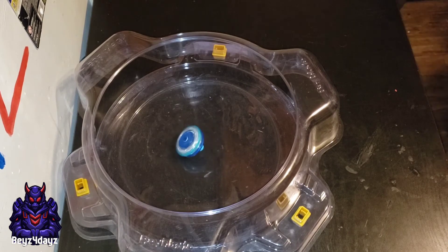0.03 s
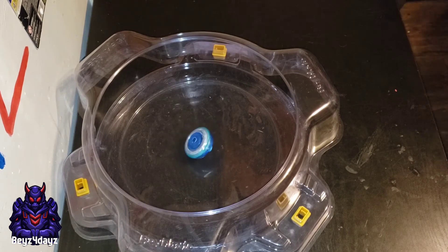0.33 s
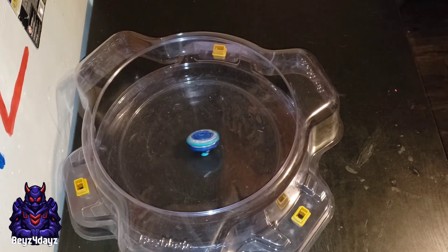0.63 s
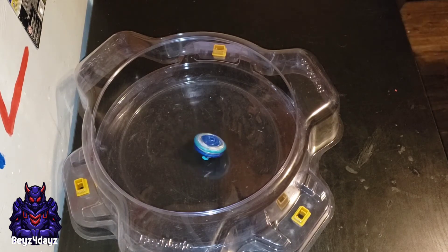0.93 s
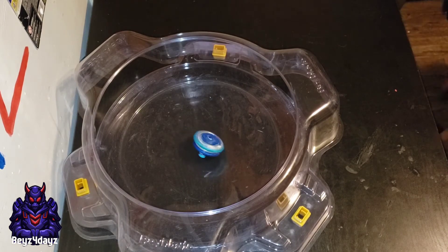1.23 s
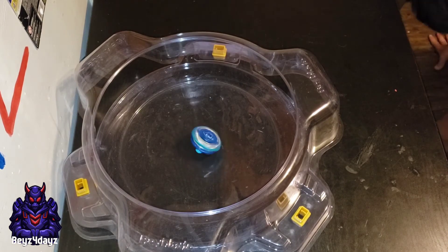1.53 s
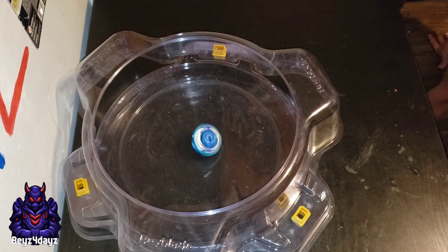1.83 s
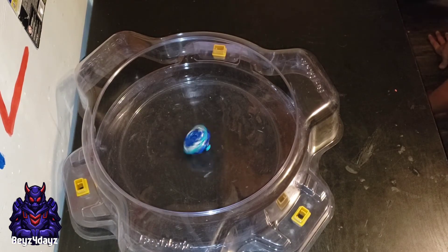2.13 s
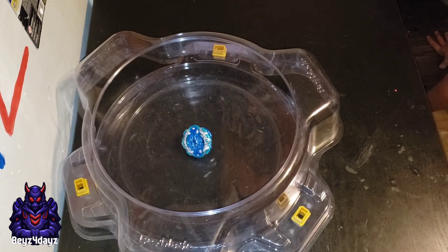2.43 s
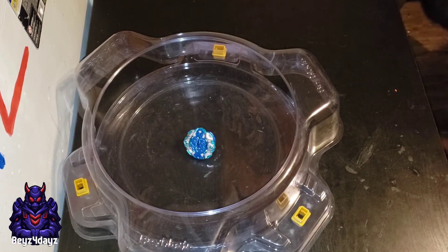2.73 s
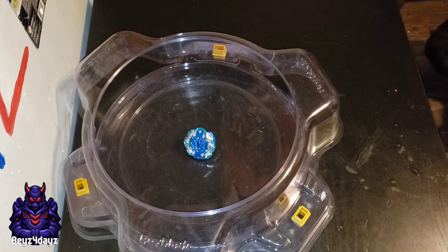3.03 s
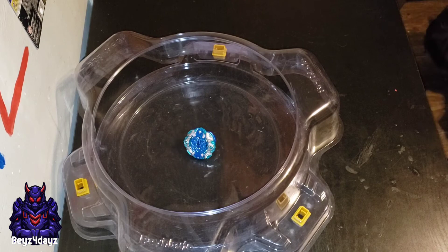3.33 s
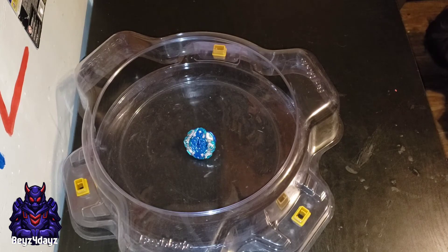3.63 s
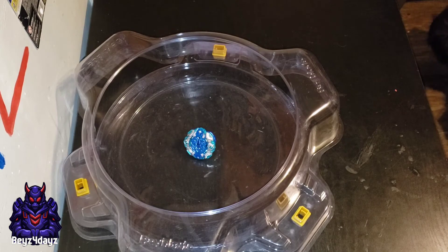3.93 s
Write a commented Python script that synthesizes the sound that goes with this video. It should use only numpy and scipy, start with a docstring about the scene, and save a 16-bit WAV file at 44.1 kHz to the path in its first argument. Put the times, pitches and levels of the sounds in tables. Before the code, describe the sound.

A toy top wobbles and rattles in a plastic arena, then rolls to a stop.

```python
"""In a quiet room with a low hum, a nearly spent toy top wobbles in a thin plastic stadium.
Its rim knocks on the stadium floor again and again: the floor booms, the walls ring and the contact
cracks. In between, the tip scratches on and loose parts rattle. Then the top lies over,
rolls to and fro on its rim and settles with a small tick."""
import sys
import numpy as np
from scipy import signal
from scipy.fft import rfft, irfft
from scipy.io import wavfile

SR = 44100
rng = np.random.default_rng(int(sys.argv[2]) if len(sys.argv) > 2 else 0)


def master(y):
    """Save y as 16-bit WAV."""
    cut = np.clip(np.atleast_2d(y).T, -1, 1)
    pcm = np.round(cut * 32767)  # scale
    wavfile.write(sys.argv[1], SR, pcm.astype(np.int16))


N = 176400
T = np.arange(N) / SR
RING_T = T[:SR // 5]  # the time axis of one short sound

# Levels are relative. A "mode" is a tone an object rings at; t60 is the time to fade by 60 dB.
# tones of the room's hum: f/Hz, level/dB
HUM = [(72, -66.5), (113, -68.5)]
# tone colours of the noises, from bass to treble: f/Hz, level/dB
AIR = [(25, -16), (70, 4.5), (88, -4.5), (115, -1), (170, -14.5), (800, -28), (8500, -43), (12000, -37)]
RUMBLE = [(35, -20), (65, -1), (120, -5.5), (590, -9.5), (720, -17), (1400, -42)]
SCRAPE = [(450, -15.5), (1100, -5), (1800, -2), (3400, 0), (4000, -7.5), (5500, -24)]
SCRATCH = [(2000, -38.5), (3500, -1.5), (5000, 1), (7200, -6), (8300, -24)]
HISS = [(6000, -14.5), (8300, -12), (12000, 1), (16000, -7)]
CLATTER = [(450, 3.5), (720, -4), (1100, 2), (1300, 0), (1650, 2.5), (2500, -3), (5000, -23.5)]
CRACK = [(1200, -22.5), (2400, 0), (3300, 1), (7000, -2.5), (8100, -12.5), (10500, -7.5), (11900, -2.5),
         (14500, -9.5)]
DRUM = [(25, -9), (60, 7), (120, 3), (330, -11), (1500, -41)]
# how hard the tip presses as the wobble eases and widens: t/s, level/dB
TIP_PRESSURE = [(0.2, 2.5), (0.55, -3), (1.2, 1.5), (2.1, -1)]
# knocks of the rim: t/s, boom/dB, hollow ring/dB, crack/dB
KNOCKS = [(0.0002, -29.5, -45.0, -41.5), (0.0275, -25, -34, -33.5), (0.0497, -27.5, -40, -33.5),
          (0.09, -29, -29.5, -37), (0.1583, -33, -30.5, -37), (0.2273, -23.5, -30, -35),
          (0.3165, -26, -38.5, -35.5), (0.377, -25.5, -40, -35.5), (0.436, -44, -43.5, -43),
          (0.5381, -45.5, -40.5, -44.5), (0.6434, -34, -37.5, -36), (0.6983, -27.5, -37.5, -35),
          (0.7718, -39, -39.5, -47.5), (0.8308, -30, -42, -41.5), (0.8735, -32.5, -39.5, -34.5),
          (0.9302, -30.5, -37, -39), (0.98, -31.5, -35.5, -41), (0.9913, -28.5, -33, -44),
          (1.0439, -28.5, -34.0, -38), (1.0556, -34.5, -40.5, -39.5), (1.1063, -27.5, -34, -38),
          (1.1528, -26, -39.5, -34.5), (1.192, -30, -41, -31.0), (1.2259, -27, -37.5, -35),
          (1.2747, -23.5, -32, -35.5), (1.3401, -28.5, -41.5, -36.5), (1.4139, -34, -34.5, -30),
          (1.461, -30, -36.5, -27.5), (1.498, -29.5, -33, -34.5), (1.5547, -29.5, -34, -33.5),
          (1.58, -35, -51, -44), (1.6, -34.5, -45.5, -41), (1.6504, -35, -37.5, -33.5),
          (1.6864, -32, -37, -46.5), (1.7055, -30.5, -43.5, -36.5), (1.7687, -31.5, -39.5, -33),
          (1.8115, -32, -40.5, -42), (1.8387, -42, -42.5, -34), (1.8755, -35.0, -41.5, -50.5),
          (1.9146, -29.5, -39.5, -41), (1.9576, -32.0, -41.5, -45), (2.0068, -34.5, -45, -33),
          (2.052, -40, -48.5, -45), (2.073, -34.5, -39.5, -50), (2.101, -38.5, -50.5, -47.5),
          (2.1582, -39.5, -38.5, -39.5), (2.3789, -40.5, -48.5, -61), (2.3873, -40, -53.5, -55),
          (2.42, -42.5, -62, -60), (2.612, -48.5, -56, -58)]
# deep modes of the stadium floor: f/Hz, level/dB, t60/s
FLOOR_MODES = [(64, -26, .16), (108, -25, .12), (148, -32, .15), (245, -14, .07), (318, 1, .11),
               (420, -15, .05)]
# modes of the floor (higher, hollow), the walls, the top, the floor under the rolling rim: f/Hz, level/dB
HOLLOW_MODES = [(498, -4.5), (555, -0.5), (604, -0.5)]
WALL_MODES = [(810, -8), (990, -2), (1095, -2), (1156, -2.5), (1580, 2.5), (1862, -2), (2830, -7)]
TOP_MODES = [(1210, 10), (1990, 1), (2430, 2), (3000, 5), (3220, 5), (3480, 4)]
ROLL_MODES = [(405, 10.5), (515, 0)]
# slides of the rim: loudest t/s, half length/s, scrape/dB, scratch/dB, hiss/dB
SLIDES = [(2.194, 0.043, -41.5, -44.5, -56), (2.28, 0.054, -65, -65, -49.5), (2.36, 0.036, -46, -51.5, -63),
          (2.556, 0.025, -55.5, -59.5, -61.5), (2.63, 0.023, -49, -53, -55.5),
          (2.74, 0.037, -46, -51.5, -76), (2.825, 0.044, -56, -50.5, -55), (2.98, 0.095, -78, -70, -80),
          (3.131, 0.042, -72, -63.5, -74), (3.269, 0.057, -74.5, -68.5, -81)]
# the rolling weight drums on floor and table: t/s, level/dB
DRUMMING = [(2.1, -54.5), (2.38, -47.5), (2.48, -64), (2.62, -54), (2.84, -53.5), (2.92, -67.5), (3.3, -86)]
# light touches of the rim: t/s, clatter/dB, crack/dB
TICKS = [(2.523, -57, -60), (2.795, -39, -56), (3.098, -76, -57)]
# how much of the left-right difference is kept: f/Hz, level/dB
WIDTH = [(60, -9), (600, -0.5), (1200, -2.5), (4000, 0.5)]
# how much louder the left side is: f/Hz, level/dB
LEFT_BOOST = [(60, 4), (200, 3.5), (600, 4.5), (1200, 0), (5200, -0.5), (7500, 11.5), (12000, 5)]

FALL_AT_S, FALL_LENGTH_S = 2.16, 0.18  # the top lies over
TIP_GRIT_DB, KNOCK_GRIT_DB, ROLL_GRIT_DB = 4.5, 1, 2  # how uneven the friction is
BOOM_DB, HOLLOW_DB, WALL_DB, CLATTER_DB, CRACK_DB = 6, 5.5, -2.5, 3.5, 4.5  # the mix within a knock
FLEX_HZ, FLEX_DB, FLEX_LAG_S, FLEX_WIDTH_S = 305, 1.5, .0023, .0024  # the floor's first give
GRAZE_S, GRAZE_DB = .0021, -2.5  # the rim scuffs the floor just before it bites
REBOUND_S, REBOUND_DB = .006, -3.5  # shortest delay and level of its lighter second contact
CRACK_T60_S = .034


def undb(db):
    """Turn decibels into a gain."""
    return 10 ** (np.asarray(db) / 20)


def unit(x):
    """Scale a signal to an average power of 1."""
    return x / np.sqrt(np.mean(x ** 2))


def fade(t60):
    """A curve that falls by 60 dB in t60 seconds."""
    return np.exp(-np.log(1000) * RING_T / t60)


def response(points):
    """The gain at every frequency, drawn through a table's points."""
    hz, db = np.array(points).T
    all_hz = np.arange(N // 2 + 1) * SR / N
    return undb(np.interp(np.log(all_hz + 1), np.log(hz), db))


def colour(x, points):
    """Give a sound a tone colour."""
    return irfft(rfft(x) * response(points), N)


def noise(points):
    """Coloured noise, unrelated left and right."""
    return unit(colour(rng.standard_normal((2, N)), points))


def through(x, impulse):
    """Let every sample of x set off a copy of the impulse."""
    return signal.fftconvolve(x, impulse, axes=-1)[:, :N]


def add(out, at_s, sound):
    """Mix a sound in at the given time."""
    start = int(at_s * SR)
    first, last = max(start, 0), min(start + sound.shape[-1], N)
    out[:, first:last] += sound[..., first - start:last - start]


def piece(x):
    """A short random piece of a long noise."""
    start = rng.integers(N - len(RING_T))
    return x[:, start:start + len(RING_T)]


def room_tone():
    """Faint air and a low hum that wavers."""
    def waver():
        return np.interp(T, np.linspace(0, T[-1], num=50), rng.standard_normal(size=50))
    hum = sum(undb(db + 2 * waver()) * np.sin(2 * np.pi * hz * T + waver()) for hz, db in HUM)
    return undb(-65.5) * noise(AIR) + hum


def friction(points, grit_db, catches_per_s=2500):
    """Rubbing surfaces catch many times, each a tiny burst of noise of its own size."""
    catches = rng.random(N) < catches_per_s / SR
    sizes = undb(grit_db * np.minimum(rng.exponential(size=N), 5))
    power = np.abs(through((catches * sizes)[None] ** 2, fade(t60=.02)[None] ** 2))
    return unit(colour(np.sqrt(power) * rng.standard_normal((2, N)), points))


def tip():
    """The tip scratches and rumbles on the floor until the top falls over."""
    layers = (SCRAPE, -50), (SCRATCH, -52), (HISS, -57.5)
    scratching = sum(undb(db) * friction(points, TIP_GRIT_DB) for points, db in layers)
    rumble = undb(-44) * noise(RUMBLE)[0]
    upright = np.clip((FALL_AT_S - T) / FALL_LENGTH_S + .5, 0, 1)
    pressure = undb(np.interp(T, *np.array(TIP_PRESSURE).T))
    return upright * pressure * (rumble + scratching)


def ringing(modes, t60=None):
    """One fading tone per mode, as complex numbers so that its phase can be turned."""
    hz, db, *own_t60 = np.array(modes).T[:, :, None]
    return undb(db) * fade(own_t60[0] if own_t60 else t60) * np.exp(2j * np.pi * hz * RING_T)


def struck(rings, scatter_db=3.5, detune=.008):
    """A hit on a new spot shifts each mode's level and pitch; the whole stays as strong."""
    level, pitch = rng.standard_normal((2, len(rings), 1))
    radians_per_s = np.angle(rings[:, 1:2]) * SR
    varied = rings * undb(scatter_db * level) * np.exp(1j * detune * pitch * radians_per_s * RING_T)
    return varied * np.linalg.norm(rings.sum(0)) / np.linalg.norm(varied.sum(0))


def spread(rings):
    """Each microphone hears each mode at its own phase."""
    return (np.exp(2j * np.pi * rng.random((2, len(rings)))) @ rings).real


def crack_fade():
    """A crack dies fast and leaves a softer, longer tail."""
    return fade(CRACK_T60_S) + undb(-4.5) * fade(t60=.11)


def knocks():
    """Each knock of the rim bends the floor, rings it and cracks; the walls ring and clatter."""
    out = np.zeros((2, N))
    floor = ringing(FLOOR_MODES)
    hollow = ringing(HOLLOW_MODES, t60=.11)
    walls = ringing(WALL_MODES, t60=.105)
    clatter, crack = friction(CLATTER, KNOCK_GRIT_DB), friction(CRACK, KNOCK_GRIT_DB)
    rise = np.minimum(RING_T / .0018, 1) ** 2
    graze_shape = undb(GRAZE_DB) * np.exp(-RING_T[::-1] / GRAZE_S)
    since = RING_T - FLEX_LAG_S
    flex = undb(FLEX_DB) * np.cos(2 * np.pi * FLEX_HZ * since) * np.exp(-(since / FLEX_WIDTH_S) ** 2)
    for at_s, boom_db, hollow_db, crack_db in KNOCKS:
        force = undb(np.mean([boom_db, hollow_db, crack_db]))
        boom = undb(boom_db + BOOM_DB)
        add(out, at_s, boom * flex)
        add(out, at_s + FLEX_LAG_S, boom * rise * struck(floor).real.sum(0))
        add(out, at_s, undb(hollow_db + HOLLOW_DB) * rise * spread(struck(hollow))[0])
        add(out, at_s, force * undb(WALL_DB) * rise * spread(struck(walls)))
        add(out, at_s, force * undb(CLATTER_DB) * rise * fade(t60=.089) * piece(clatter))
        add(out, at_s, undb(crack_db + CRACK_DB) * rise * crack_fade() * piece(crack))
        rebound = fade(CRACK_T60_S) * (force * piece(clatter) + undb(crack_db) * piece(crack))
        add(out, at_s + REBOUND_S * (1 + 2 * rng.random()), undb(REBOUND_DB) * rebound)
        graze = graze_shape * (force * piece(clatter) + undb(crack_db) * piece(crack))
        add(out, at_s - RING_T[-1], graze)
    return out


def rattle(crack, clatter, count=130, base_db=-50.5, scatter_db=8):
    """Loose parts click at random during the wobble, louder when the tip presses harder."""
    out = np.zeros((2, N))
    for at_s, size in zip(FALL_AT_S * rng.random(count), rng.standard_normal(count)):
        db = base_db + scatter_db * min(size, 2) + np.interp(at_s, *np.array(TIP_PRESSURE).T)
        add(out, at_s, undb(db) * fade(CRACK_T60_S) * (piece(crack) + piece(clatter)))
    return out


def slides(roundness=1.4):
    """The fallen top slides on its rim in swells that scrape, scratch and hiss."""
    peak_s, half_s, *levels = np.array(SLIDES).T
    swells = np.exp(-np.abs((T - peak_s[:, None]) / half_s[:, None]) ** roundness)
    scrape = friction(SCRAPE, ROLL_GRIT_DB) + undb(-6.5) * noise(RUMBLE)[0]
    layers = scrape, friction(SCRATCH, ROLL_GRIT_DB), friction(HISS, ROLL_GRIT_DB)
    return sum(np.sqrt(undb(db) ** 2 @ swells) * layer for db, layer in zip(levels, layers))


def drumming():
    """The rolling weight drums on the floor and the table."""
    times, db = np.array(DRUMMING).T
    return np.interp(T, times, undb(db), left=0, right=0) * noise(DRUM)[0]


def ticks(crack, clatter):
    """The rim touches down lightly as the top settles."""
    out = np.zeros((2, N))
    for at_s, clatter_db, crack_db in TICKS:
        touch = undb(clatter_db) * piece(clatter) + undb(crack_db) * piece(crack)
        add(out, at_s, crack_fade() * touch)
    return out


def rubbed(modes, t60, peak_s, half_s, db):
    """The sliding rim keeps modes ringing for one swell."""
    impulse = ringing(modes, t60).imag.sum(0)[None]
    ring = unit(through(friction(SCRAPE, ROLL_GRIT_DB), impulse))
    return undb(db) * np.exp(-((T - peak_s) / half_s) ** 2 / 2) * ring


def scene():
    """Wobbling gives way to rolling, and the small room adds a short echo."""
    top = knocks()
    crack, clatter = friction(CRACK, KNOCK_GRIT_DB), friction(CLATTER, KNOCK_GRIT_DB)
    top += ticks(crack, clatter) + rattle(crack, clatter) + tip() + slides()
    top += rubbed(TOP_MODES, t60=.053, peak_s=2.745, half_s=.042, db=-43)
    top += rubbed(ROLL_MODES, t60=.3, peak_s=2.99, half_s=.08, db=-70.5)
    top += drumming()
    echo = rng.standard_normal((2, len(RING_T))) * fade(t60=.13) * np.minimum(RING_T / .016, 1)
    echo *= undb(-9.5) / np.sqrt(np.sum(echo ** 2) / 2)
    return top + through(top, echo) + room_tone()


def record(dry, low_cut_hz=35, high_cut_hz=15900):
    """Two close microphones hear much the same bass; the left gets more bass and treble."""
    mid, side = dry.mean(0), colour((dry[0] - dry[1]) / 2, WIDTH)
    lean = np.sqrt(response(LEFT_BOOST))
    heard = irfft(rfft([mid + side, mid - side]) * np.array([lean, 1 / lean]), N)
    heard = signal.sosfilt(signal.butter(2, low_cut_hz, "high", fs=SR, output="sos"), heard)
    return signal.sosfilt(signal.ellip(10, .2, 80, high_cut_hz, fs=SR, output="sos"), heard)


dry = scene()
out = record(dry)
master(out)
```